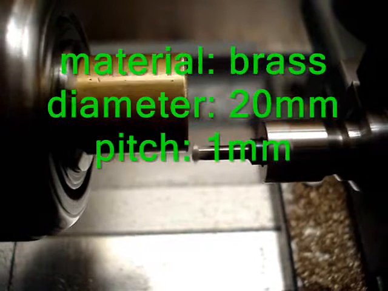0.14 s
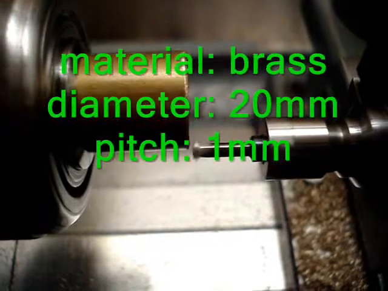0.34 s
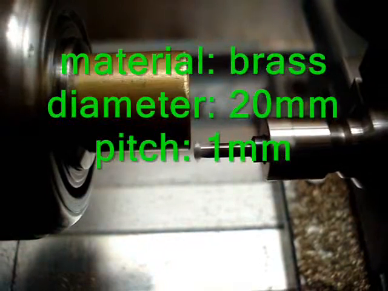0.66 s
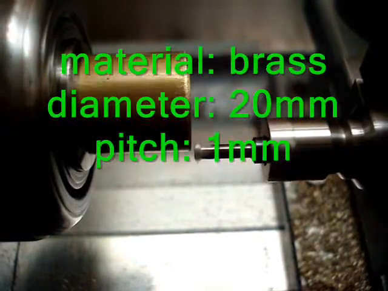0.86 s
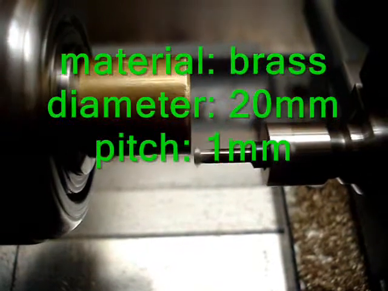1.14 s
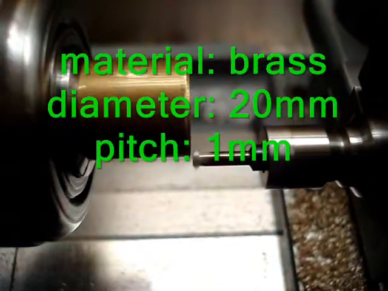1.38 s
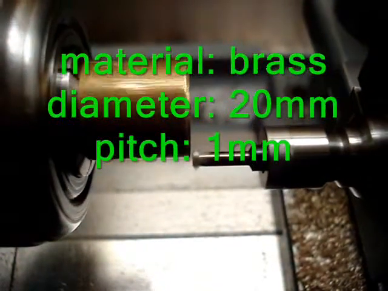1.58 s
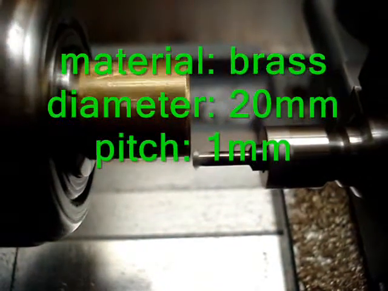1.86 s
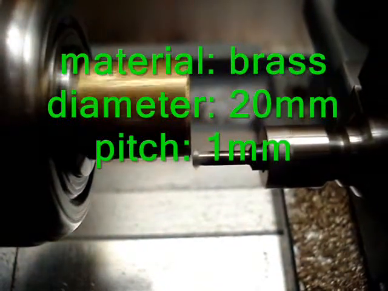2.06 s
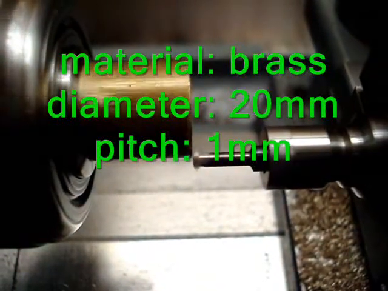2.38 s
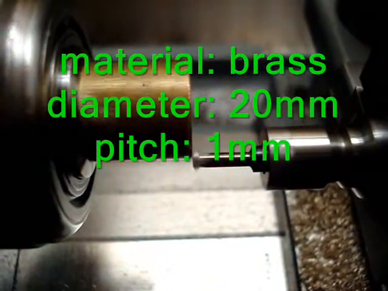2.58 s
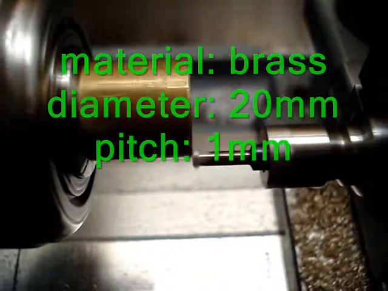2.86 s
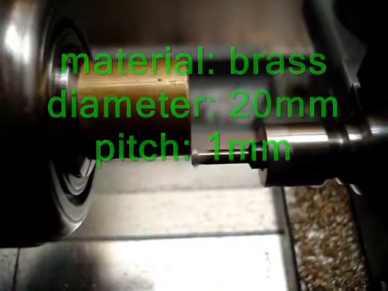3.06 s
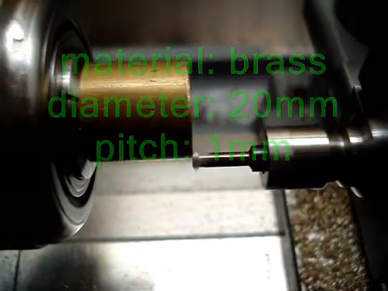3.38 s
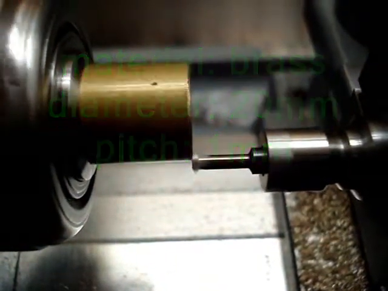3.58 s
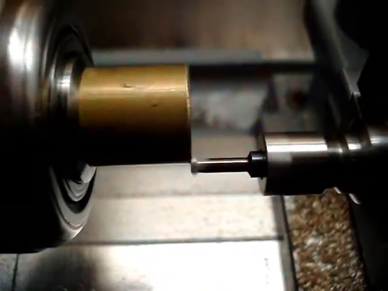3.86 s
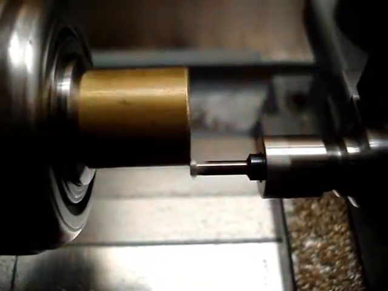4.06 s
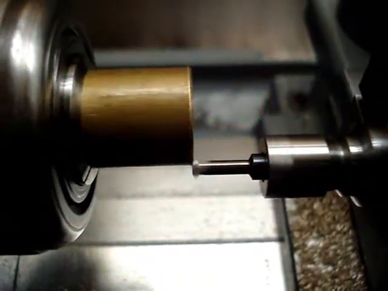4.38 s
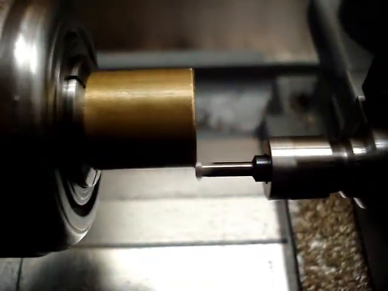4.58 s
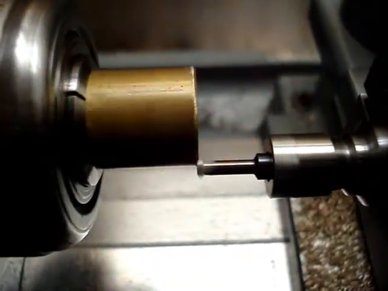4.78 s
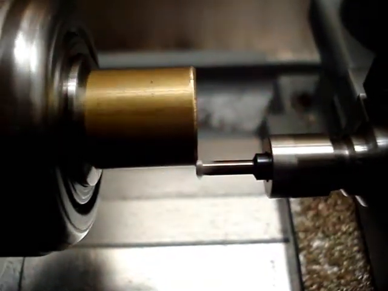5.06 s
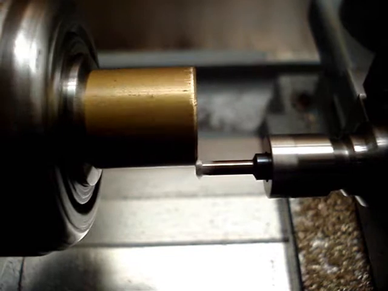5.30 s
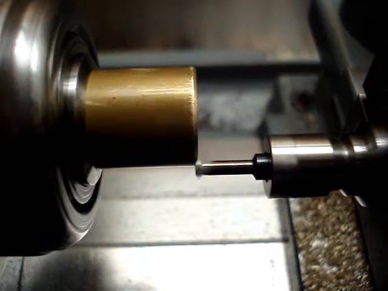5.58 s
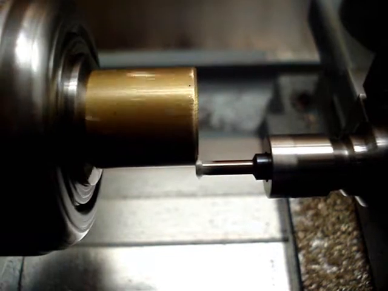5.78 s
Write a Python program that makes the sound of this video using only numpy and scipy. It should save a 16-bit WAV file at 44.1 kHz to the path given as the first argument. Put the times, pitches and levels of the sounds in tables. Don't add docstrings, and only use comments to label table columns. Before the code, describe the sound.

Close to a small lathe, an air-cooled spindle whines with a dense, buzzy bearing tone and rushing air, resonant in a metal cabinet. A dull double knock comes early; past the middle the whine dips slightly and changes colour. Near the end the cutter suddenly bites brass, with a loud rasping ring and hissing chips as the pitch sags. Cheap camera microphone, with thin metallic treble.

```python
import sys
import numpy as np
from scipy import signal
from scipy.fft import rfft, irfft, next_fast_len
from scipy.io import wavfile
from scipy.ndimage import uniform_filter1d, map_coordinates

SR = 44100
rng = np.random.default_rng(int(sys.argv[2]) if len(sys.argv) > 2 else 0)


def persist_wave(psi):
    counts = np.round(np.clip(psi, -1, 1) * 32767).astype(np.int16)
    wavfile.write(sys.argv[1], SR, np.atleast_2d(counts).T)


def decibels_to_gain(level_db):
    exponent = np.asarray(level_db, float) / 20
    return 10 ** exponent


N = 261513
T = np.arange(N) / SR
STEP_S = 3.67


def spindle(turns):
    return shaft(turns) + bearing(turns) + air_rush(turns) + panel_boom()


SHAFT_ORDERS = [*range(1, 17), 18, 20, 21, 24, 31, 35, 37]
# level/dB before the speed step, level/dB after it
SHAFT_LEVELS = [(-39, -39.5), (-41, -38.5), (-43, -39.5), (-43.5, -40), (-34.5, -41.5), (-46.5, -40),
                (-40, -35.5), (-33, -32.5), (-43.5, -46), (-37.5, -49), (-46, -45), (-48, -57), (-55, -47),
                (-51.5, -48.5), (-56, -58), (-66, -64), (-74, -73), (-77, -64), (-81, -69), (-51.5, -56),
                (-72, -69), (-77, -68), (-67.5, -66)]


def shaft(turns):
    after = ramp(T, STEP_S, 0.044)
    low = tones(SHAFT_ORDERS[:3], SHAFT_LEVELS[:3], turns, after, wobble_db=0.32, wander=0.036, rate=30)
    high = tones(SHAFT_ORDERS[3:], SHAFT_LEVELS[3:], turns, after, wobble_db=1.23, wander=0.22, rate=20)
    return low + high


BALL_ORDERS = [4.55, 5.65, 5.85, 6.65, 8.65, 9.65, 9.85, 10.65, 11.65, 12.65, 12.85, 13.65, 14.55, 17.3,
               18.3, 18.9, 20.4, 29.1]
# level/dB before the speed step, level/dB after it
BALL_LEVELS = [(-43.5, -42.5), (-40.5, -40), (-41, -38), (-42.5, -36.5), (-41.5, -40), (-42, -41.5),
               (-39.5, -39), (-48.5, -59), (-42.5, -47), (-73, -66), (-67, -51.5), (-49, -49.5), (-48, -50),
               (-74, -68), (-61, -59.5), (-58.5, -55), (-74, -63.1), (-58, -64)]


def bearing(turns):
    after = ramp(T, STEP_S, 0.044)
    return tones(BALL_ORDERS, BALL_LEVELS, turns, after, wobble_db=1.53, wander=0.35, rate=21.97)


# f/Hz, level/dB per Hz
RUSH_COLOUR = [(25, -50), (100, -28), (200, -18), (370, -20), (520, -9.5), (720, -7), (1150, -5),
               (1500, -3), (2050, -9), (2450, -12), (3300, -19), (3800, -25.5), (6000, -31), (9000, -40)]
# f/Hz, width/Hz, level/dB
CABINET_MODES = [(830, 127, 6.5), (980, 45, 0), (1593, 156, 3.5), (1792, 145, 6), (1940, 35, 6),
                 (2224, 84, 2.5), (2793, 117, 3), (1133, 34, -7.5), (743, 39, -13.5), (2460, 41, -3),
                 (3030, 56, -4.5), (3300, 60, -4.5), (4790, 200, -5)]


def air_rush(turns):
    throb = 1 + 0.16 * np.cos(2 * np.pi * turns) + 0.09 * np.cos(2 * np.pi * 2 * turns)
    rush = noise(RUSH_COLOUR, CABINET_MODES, flicker_db=.8, rate=40, ripple_db=1.5)
    return rush * throb * decibels_to_gain(-23.5 + 0.11 * T)


def panel_boom():
    boom = signal.lfilter(*signal.iirpeak(835, 9, fs=SR), rng.standard_normal(N))
    return boom / np.std(boom) * decibels_to_gain(-36.5 + 4 * walk(1.68))


def speed():
    idle = 223.1 - .4 * np.exp(-T / .7) + .07 * walk(3)
    droop_s, recover_at_s, recover_s = .11, 4.1, 1.05
    fall = ramp(T, STEP_S - droop_s / 2, droop_s)
    recovery = ramp(T, recover_at_s, recover_s) ** 1.5
    droop = 1.05 * (fall - recovery)
    sag = 6.9 * np.maximum(T - 5.49, 0)
    return idle - droop - sag


TOUCH_S = 5.453


def cutter(turns):
    touch_db = -24 * np.exp(-np.maximum(T - TOUCH_S, 0) / .009)
    chatter = 0.19 * walk(28)
    depth = 5.1 * np.maximum(T - 5.56, 0) + chatter
    small_tool = signal.butter(3, 330, "high", fs=SR, output="sos")
    torn = chips(turns, depth, touch_db) + squeal(turns, depth, touch_db)
    return (T > TOUCH_S) * (cut_ring(turns, depth, touch_db) + signal.sosfilt(small_tool, torn))


# level/dB at first touch, level/dB in a shallow cut, level/dB in a deep cut
CUT_LEVELS = [(-44, -31.5, -35), (-43, -49, -40), (-34, -26, -23.5), (-28.5, -27, -20), (-15, -20, -21.5),
              (-18.5, -18, -13), (-36, -43, -48.0), (-30, -26, -23.5), (-35.0, -38, -29), (-34, -28.5, -36),
              (-32, -28.5, -36), (-26.5, -26, -40), (-31.5, -35, -38), (-41, -36, -49), (-36.5, -40, -53),
              (-43, -47, -36), (-58, -62.0, -50.0), (-55, -36, -39), (-62.0, -61.0, -52), (-49, -45, -46.0),
              (-54.0, -63.0, -61.0), (-49, -55, -43), (-47, -56, -45.0), (-61.0, -45, -45), (-62, -49, -48),
              (-64.0, -63.0, -61.0), (-61, -58.0, -61.0), (-57, -64.0, -62.0)]


def cut_ring(turns, depth, touch_db):
    ring = tones(range(2, 30), CUT_LEVELS, turns, depth, wobble_db=1.1, wander=0.18, rate=30, spread=0.49)
    return ring * decibels_to_gain(0.65 + touch_db)


# f/Hz, level/dB per Hz
CHIP_COLOUR = [(60, -50), (200, -21), (500, -14), (900, -9), (1400, -1), (2000, -10.5), (2900, -12.5),
               (3600, -18.5), (4200, -24), (4900, -29), (6000, -28), (8000, -31.5), (14000, -55)]


def chips(turns, depth, touch_db):
    hiss = noise(CHIP_COLOUR, [], flicker_db=1.4, rate=25, ripple_db=1.5)
    level_db = -27.5 + 3.5 * depth + touch_db / 2
    return hiss * (.5 + puff(turns)) * decibels_to_gain(level_db + 1.4 * size_each_turn(turns))


# f/Hz, level/dB per Hz
SQUEAL_COLOUR = [(3000, -50), (4900, -14), (5300, 0), (5800, -4), (6300, -4), (7000, -20), (10000, -50)]


def squeal(turns, depth, touch_db):
    rub = noise(SQUEAL_COLOUR, [], flicker_db=2.5, rate=40, ripple_db=2.5)
    level_db = -54 + 9.5 * ramp(depth, 0.75, 0.46) + touch_db / 2
    return rub * (.2 + puff(turns)) * decibels_to_gain(level_db + 4 * size_each_turn(turns))


def puff(turns):
    return np.exp(-(turns % 1) / 0.46)


def size_each_turn(turns):
    return rng.standard_normal(N // 100)[turns.astype(int)]


def lathe():
    return electric_tones() + hum_spells() + knocks()


MOTOR_HZ = [300, 1200.7, 1261, 1480]
MOTOR_LEVELS = [(-56.5,), (-43,), (-58,), (-51,)]


def electric_tones():
    return tones(MOTOR_HZ, MOTOR_LEVELS, T, 0, wobble_db=4.5, wander=.4, rate=15)


# t/s at the start, length/s, f/Hz, level/dB
HUM_SPELLS = [(-.05, .13, 103, -52), (.06, 0.24, 178, -53), (.59, 0.13, 103, -54.5), (.62, .3, 60, -63),
              (1.1, .17, 60, -59), (1.17, 0.2, 178, -48), (1.5, .28, 60, -58), (1.63, .1, 105, -54),
              (1.828, 0.44, 103, -52.5), (2.25, .07, 60, -60), (2.47, .07, 60, -60), (2.79, .1, 103, -55),
              (2.8, .07, 60, -62), (3.38, 0.23, 178, -58), (3.896, 0.185, 105, -56), (4.347, .15, 103, -52),
              (4.46, .2, 178, -50), (5.01, .27, 60, -60), (5.02, .07, 103, -56), (5.5, .15, 60, -63),
              (5.6, .3, 178, -53)]


def hum_spells():
    out = np.zeros(N)
    wobble_db, wander = 1.2 * walk(12), .3 * walk(12)
    edge_s = .03
    for start, length, hz, db in HUM_SPELLS:
        fade_in = ramp(T, start - edge_s, 2 * edge_s)
        fade_out = ramp(T, start + length - edge_s, 2 * edge_s)
        hum = np.sin(2 * np.pi * hz * T + wander)
        out += (fade_in - fade_out) * np.sqrt(2) * decibels_to_gain(db + wobble_db) * hum
    return out


# t/s at the peak, level/dB at the peak, f/Hz, half length/s
KNOCKS = [(0.808, -28, 400, 0.0071), (0.833, -23.5, 390, 0.0069), (0.853, -35, 430, .012),
          (4.65, -38, 4150, .003), (4.684, -41, 4100, .003), (4.944, -43, 4200, .003),
          (5.2, -26, 4200, .0005), (5.7535, -29, 60, 0.0022), (5.84, -30, 90, 0.0016),
          (5.853, -28, 150, .0025), (5.883, -44, 60, .004), (5.91, -33, 40, .004), (5.916, -34, 60, .004),
          (5.928, -36, 70, .004)]


def knocks():
    out = np.zeros(N)
    for peak_s, db, hz, half_s in KNOCKS:
        swell = np.exp(-((T - peak_s) / half_s) ** 2)
        out += decibels_to_gain(db) * np.cos(2 * np.pi * hz * (T - peak_s)) * swell
    return out


def tones(multiples, table, turns, stage, wobble_db, wander, rate, spread=1):
    out = np.zeros(N)
    for multiple, levels in zip(multiples, table):
        db = np.interp(stage, np.arange(len(levels)), levels) + wobble_db * walk(rate)
        phase = 2 * np.pi * (multiple * turns + spread * rng.random()) + wander * walk(rate)
        out += decibels_to_gain(db) * np.sin(phase)
    return np.sqrt(2) * out


def noise(colour, peaks, flicker_db, rate, ripple_db):
    size = next_fast_len(N)
    hz = np.maximum(np.arange(size // 2 + 1) * SR / size, 1)
    colour_hz, colour_db = np.transpose(colour)
    db = np.interp(np.log(hz), np.log(colour_hz), colour_db)
    for f, width, height in peaks:
        db = db + height / (1 + (2 * (hz - f) / width) ** 2)
    db = db + ripple_db * np.interp(hz / 25, np.arange(900), rng.standard_normal(900))
    spectrum = rfft(rng.standard_normal(size)) * decibels_to_gain(db) * np.minimum(hz / 50, 1) ** 2
    place = np.clip(3 * np.log2(hz / 20), 0, 29)
    out = np.zeros(N)
    for k in range(30):
        band = np.clip(1 - abs(place - k), 0, 1)
        out += irfft(spectrum * band, size)[:N] * decibels_to_gain(flicker_db * walk(rate))
    return out / np.std(out)


def walk(rate):
    k = int(SR / rate)
    held = np.repeat(rng.standard_normal(N // k + 1), k)
    return 1.161 * uniform_filter1d(uniform_filter1d(held, k), k)[:N]


def ramp(x, start, span):
    return np.clip((x - start) / span, 0, 1)


def scene():
    turns = np.cumsum(speed()) / SR
    return (spindle(turns) + cutter(turns) + lathe())[None]


# t/s of the first block, block length/s, slip at its start [samples], step length/s, slip a step [samples]
SLIPS = (-.607, .895, .45, .1435, .31)


def repeat_nearest(x):
    start, block, block_slip, step, slip = SLIPS
    ratio = 31999.87 / SR
    blocks, age = np.divmod(T - start, block)
    slipped = blocks * (block_slip + block // step * slip) + age // step * slip
    place = np.arange(N) * ratio + slipped
    nearest = np.arange(N) + (np.round(place) - place) / ratio
    held = map_coordinates(x, [nearest], order=3, mode="nearest")
    return signal.sosfiltfilt(signal.ellip(12, .1, 70, 15430, fs=SR, output="sos"), held)


def thin_quiet_gap(x, keep_db):
    window, size, overlap = ("tukey", .5), 2816, 768
    hz, _, cells = signal.stft(x, SR, window, size, overlap)
    inside = (hz > 11300) & (hz < 12850)
    gap = cells[inside]
    rms = np.sqrt(np.mean(abs(gap) ** 2, axis=0))
    threshold = rms * decibels_to_gain(keep_db + 1.2 * rng.standard_normal(gap.shape[1]))
    cells[inside] = gap * (abs(gap) > threshold)
    return signal.istft(cells, SR, window, size, overlap)[1][:N]


def low_pass(x):
    return signal.sosfilt(signal.butter(12, 15950, fs=SR, output="sos"), x)


def record(dry):
    soft = .95 * np.tanh(dry[0] / .95)
    held = repeat_nearest(soft)
    mix = thin_quiet_gap(held, keep_db=2.2)
    return low_pass(mix[None])


dry = scene()
out = record(dry)
persist_wave(out)
```